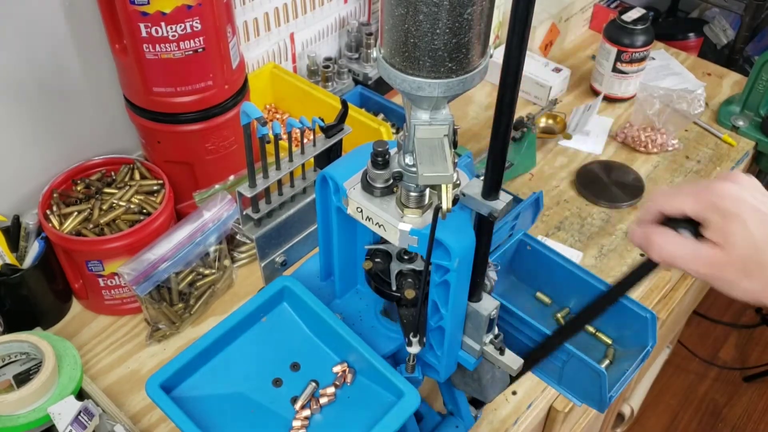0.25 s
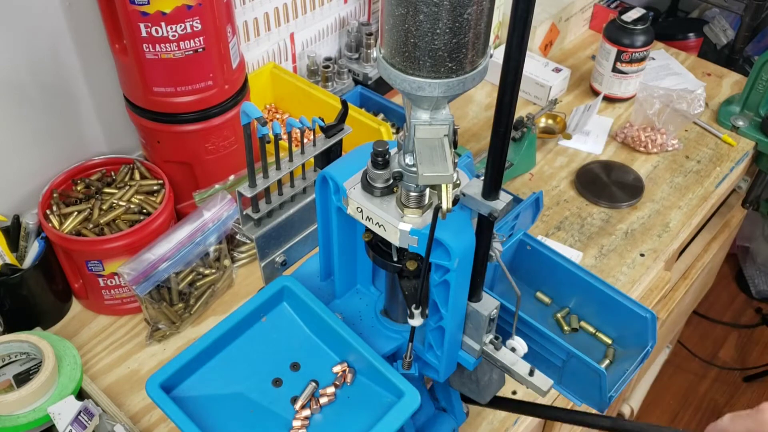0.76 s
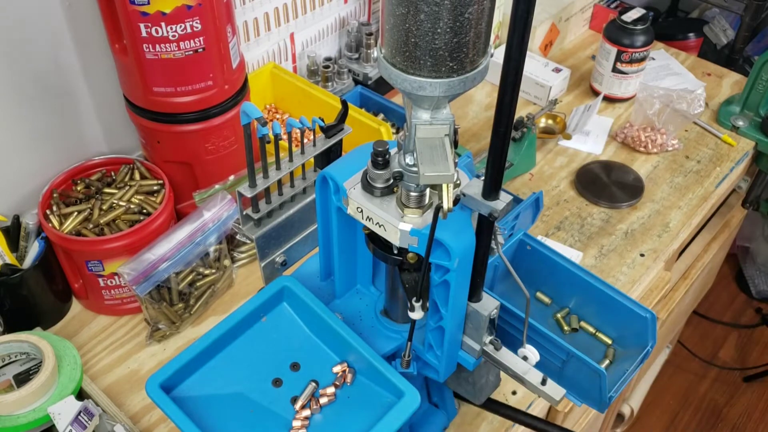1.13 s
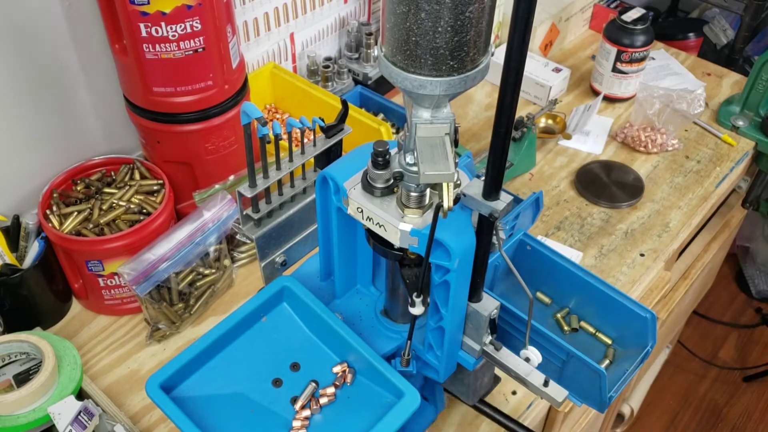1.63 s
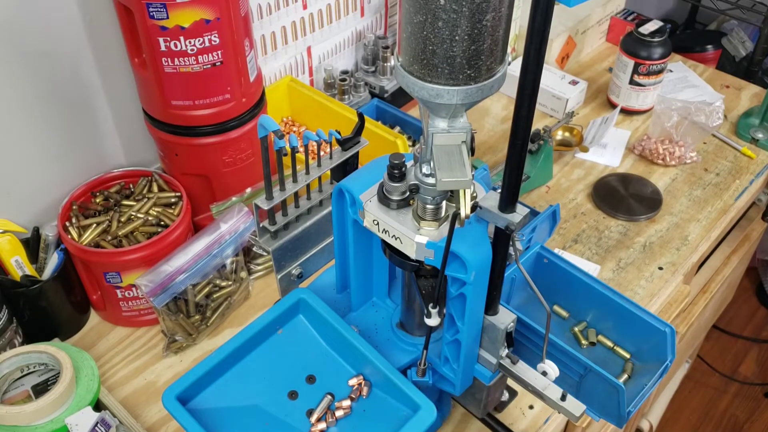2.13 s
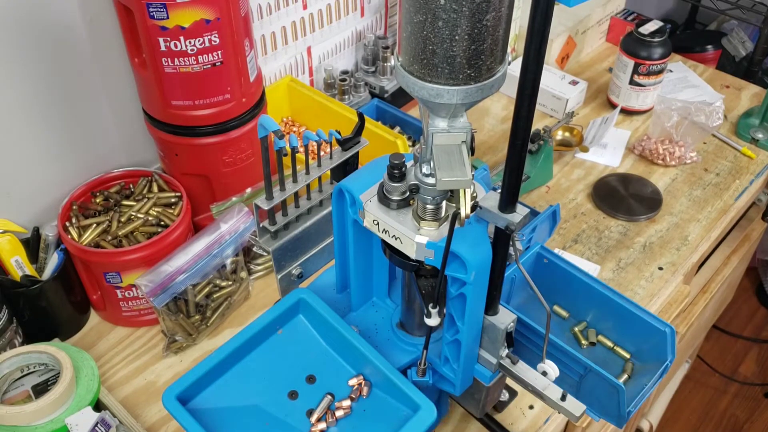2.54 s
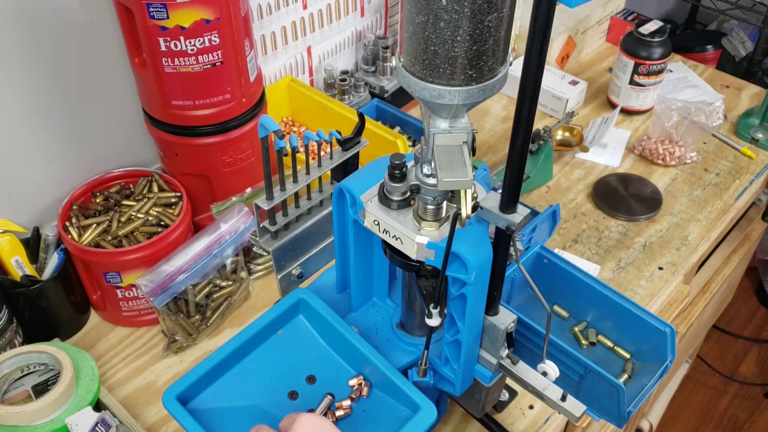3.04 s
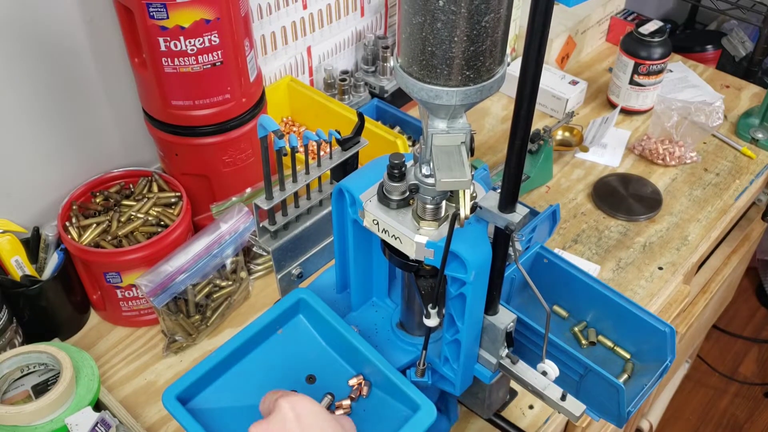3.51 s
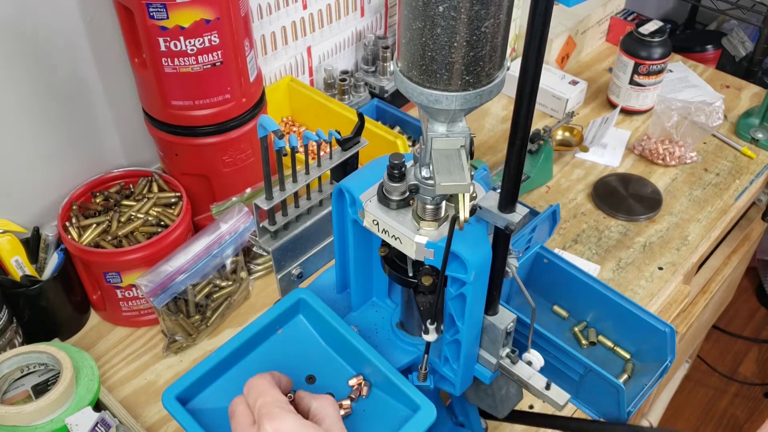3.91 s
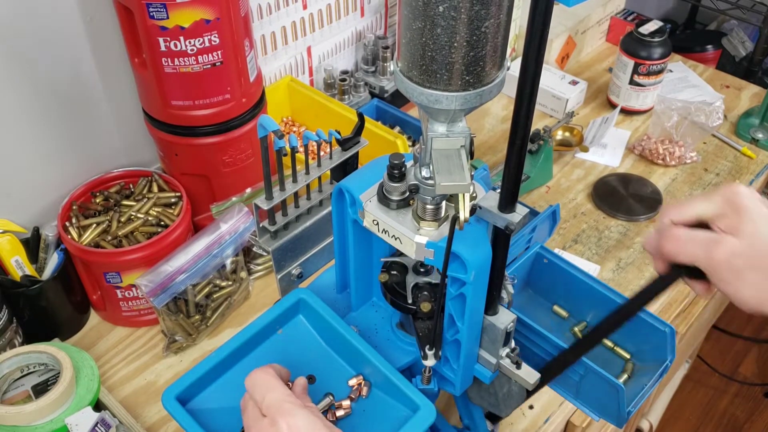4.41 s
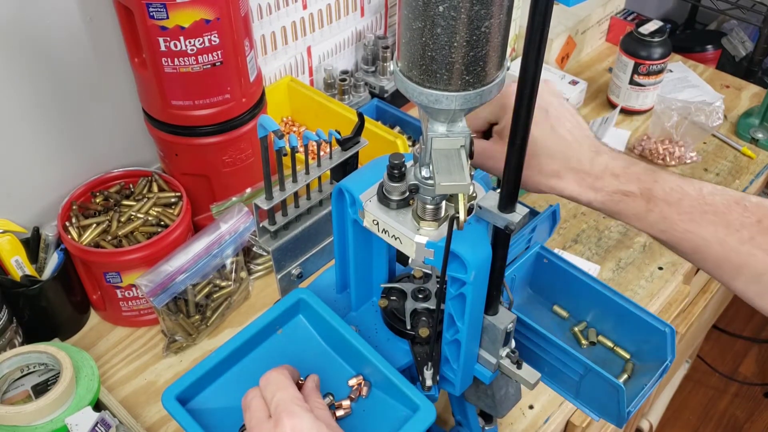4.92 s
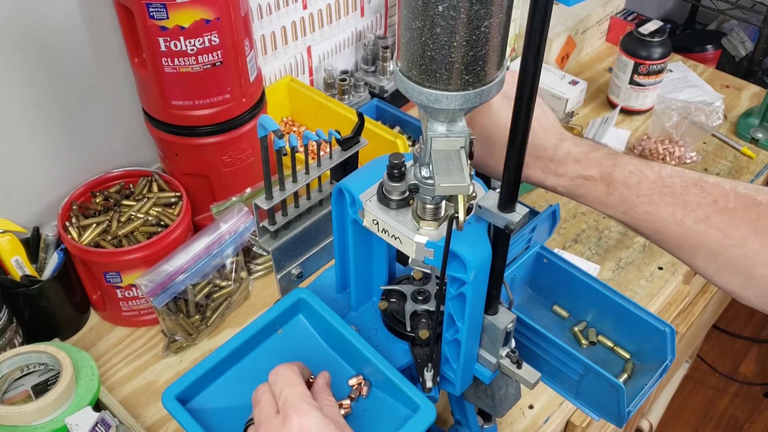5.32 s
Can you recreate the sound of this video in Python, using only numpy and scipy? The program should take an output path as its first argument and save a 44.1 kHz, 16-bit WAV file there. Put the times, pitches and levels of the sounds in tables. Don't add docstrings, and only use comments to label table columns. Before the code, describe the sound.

Sharp steel clicks, a hollow clunk, rattling linkage and bright metallic pings from a hand-operated bench press in a quiet workshop.

```python
import sys
import numpy as np
from scipy import signal
from scipy.fft import rfft, irfft, next_fast_len
from scipy.io import wavfile
from scipy.ndimage import uniform_filter1d, map_coordinates

SR = 44100
rng = np.random.default_rng(int(sys.argv[2]) if len(sys.argv) > 2 else 0)


def voltage_ratio(decibels):
    exponent = np.asarray(decibels, float) / 20
    return 10 ** exponent


def wrap_up_sound(samples):
    columns = np.atleast_2d(samples).T
    tamed = np.clip(columns, -1, 1)
    steps = np.round(tamed * 32767).astype(np.int16)
    wavfile.write(sys.argv[1], SR, steps)


N = 245195

# s, tick_db (peak), clack_db and knock_db (both over the tick)
SNAPS = [(0.1814, -13.5, -11.5, -15), (0.1908, -14.5, -11.5, -11.5), (3.4585, -30, 13, 12),
         (3.5395, -17, -22, -20), (3.6614, -24, 4.5, 18), (4.3749, -13.5, -12.5, -12.5),
         (4.653, -28, -10, -12), (4.7078, -18.5, -26, -25), (4.7095, -34, -30, -30),
         (4.7555, -1.5, -26, -29.5), (5.4325, -37, -10, 17)]
# s, tick_db, clack_db, knock_db
CLACKS = [(0.0004, -14, -8, -7.5), (0.3731, -36, 5, -12), (0.389, -30, 0, -4), (0.4026, -12, -5, -8),
          (0.4894, -35, 0, -15), (1.7175, -15.5, -2, 1), (3.412, -34, 0, 16), (3.743, -20, 0.5, 1.5),
          (4.4781, -22, -7.5, -11), (4.8408, -29, 1, 7), (4.9045, -33, -2, 3)]
# s, tick_db, clack_db, knock_db
THUDS = [(1.0899, -25.5, 9.5, 7), (1.344, -46, -2.5, 1), (1.5896, -36, 8, 12), (1.6312, -31, 5, -3),
         (3.3388, -38.5, -15, 0.5), (3.3472, -36.5, 3, 13), (3.366, -31.5, -3, -9), (3.3768, -32, -2.5, 9),
         (3.7193, -38.5, 13, 2), (3.779, -25, 3, -7), (4.995, -28, -8.5, 6), (5.0102, -38, -5, 12),
         (5.0612, -42.5, -4, 8), (5.0848, -44.5, -2, 8), (5.1354, -43, -7.5, -9)]
# s, tick_db, clack_db
TAPS = [(0.3461, -38, -9), (0.8903, -40, -10.5), (0.9972, -43, -8), (.9495, -41, -6), (1.1835, -37, 0.5),
        (1.1992, -44, 5.5), (1.4178, -33.5, -25), (1.8063, -37, -25), (1.8233, -24.5, -13.5),
        (2.595, -47, 1.5), (3.1854, -55, 10), (3.4272, -23, -7.5), (3.4872, -14.5, -5.5),
        (3.4928, -22.5, -6.5), (3.4525, -21, -22), (3.845, -38, -15), (3.7544, -17.5, -4.5),
        (4.5244, -32.5, -8), (4.609, -32.5, -4.5), (4.794, -28.5, -12), (4.9202, -35, -8)]
# s, tick_db, clack_db
SCUFFS = [(.882, -49, -8), (.9, -45, -5), (0.947, -44, -4), (1.39, -37, -8), (1.414, -40.5, -11),
          (5.304, -44.5, -3), (4.52, -40, -2), (4.609, -42, 2), (4.855, -42, 5)]
# boom_db (over the knock), t60_s
CONTACT_KINDS = [
    (-12, 0.027),
    (-17.5, 0.038),
    (-3, .036),
    (3, 0.037),
    (-2.5, .15),
]


def contacts():
    knock_db = -14.5
    taps = [(*row, knock_db) for row in TAPS]
    scuffs = [(*row, knock_db) for row in SCUFFS]
    events = []
    for rows, (boom_db, t60) in zip([SNAPS, CLACKS, THUDS, taps, scuffs], CONTACT_KINDS):
        events += [(*row, row[-1] + boom_db, t60) for row in rows]
    return events


# hz, gain_db (per Hz)
TICK_SPECTRUM = [(5000, -37.5), (7500, -6), (9900, -2), (11600, 3), (13000, -8), (14800, -4.5),
                 (16000, 0.5)]
# hz, gain_db (per Hz)
CLACK_SPECTRUM = [(700, -25), (1150, -7), (1500, 0.5), (2000, -1), (2600, -3), (3300, -4.5), (4900, -9.5),
                  (6300, -8.5), (7500, -12), (9000, -20), (12000, -56.5)]
# hz, width_hz, level_db
FRAME_MODES = [(336, 40, -3), (394, 50, -1.5), (475.6, 35, 3), (569, 35, 3.5), (629, 70, 0.5),
               (799, 113, -1), (1148, 87, -3), (1517, 84, -6.5), (2300, 2400, -16)]
# hz, width_hz, level_db
BENCH_MODES = [(64.5, 7.4, 3), (98.2, 24, 0), (150, 28, -3.5), (183.3, 19, -0.5), (234.5, 25, -1.5),
               (298, 60, -6)]
# trim_db, push_db, room_tail_db (under the blow), tail_t60_s, rise_s, decay_factor
BODY_RESPONSE = [
    (-4, -6, -14, 0.36, 0.00077, 1.06),
    (-5, -9, -10.5, 0.34, 0.00093, 0.76),
    (-2.5, 7.5, -11, 0.35, 0.0018, 0.7),
    (-2.5, 14, -3, 0.41, 0.0031, 3.1),
]


def blows():
    t = np.arange(SR // 2) / SR
    events = contacts()
    bodies = [coloured(TICK_SPECTRUM), coloured(CLACK_SPECTRUM),
              resonant(FRAME_MODES, low_hz=257, high_hz=1800),
              resonant(BENCH_MODES, low_hz=39.5, high_hz=400)]
    out = np.zeros(N)
    for k, (body, response) in enumerate(zip(bodies, BODY_RESPONSE)):
        trim_db, push_db, tail_db, tail_t60, rise, slower = response
        power, push = np.zeros(N), np.zeros(N)
        tail = voltage_ratio(tail_db - 60 * t / tail_t60) ** 2
        for s, tick_db, *over_tick_db, t60 in events:
            size = voltage_ratio(tick_db + [0, *over_tick_db][k] + trim_db)
            burst = voltage_ratio(-120 * t / (t60 * slower))
            echo = tail * min(1.5, t60 / 0.036) ** 2
            onset = rise * softness(tick_db) * max(1, t60 / 0.033)
            add(power, s, size ** 2 * (burst + echo) * np.minimum(t / onset, 1) ** 2)
            push[round(s * SR) + 20] = size * voltage_ratio(push_db) * min(1, 0.0097 / t60) / softness(tick_db)
        rattle = np.sqrt(power) * voltage_ratio(0.92 * wobble(300)) * patchy(depth_db=2.5)
        out += filtered(push + rattle, body)
    return out


# s, boom_db
HEAVES = [(3.33, -36), (3.41, -32), (3.9, -33.5), (3.5, -34), (3.58, -34), (3.68, -36), (1.1, -46)]


def heave():
    power, t = np.zeros(N), np.arange(SR // 2) / SR
    for s, db in HEAVES:
        add(power, s, voltage_ratio(db - 60 * t / 0.2) ** 2 * np.minimum(t / 0.034, 1) ** 2)
    legs = [(42, 23, 2), (67.5, 20, -1), (100, 22, -4)]  # hz, width_hz, level_db
    return filtered(np.sqrt(power) * rng.standard_normal(N), resonant(legs, low_hz=25, high_hz=200))


CASE_HZ = [4650, 8780, 11200, 11680, 13810, 13890, 15320]
# level_db, t60_s
CASE_MODES = [(-15, 0.4), (-12, 0.2), (-14, 0.3), (-2.5, 0.25), (-6, .16), (-6.5, 0.24), (-24, 0.4)]
# s, peak_db
CASE_HITS = [
    (0.182, -17.5),
    (0.192, -31),
]


def brass_case():
    return struck(CASE_HZ, CASE_MODES, CASE_HITS, trim_db=-5, unsteady_hz=250, clean_s=.12)


PLATE_HZ = [7214, 8183, 9114, 10290, 10520, 10940, 12260, 13400, 13865, 14250, 14920]
# level_db, t60_s
PLATE_MODES = [(-2.5, 0.3), (-11.5, 0.6), (-2, .22), (-11, .25), (-13, .4), (-5, 0.2), (-6, .25),
               (-10, .27), (3.5, .3), (-8, .2), (4, 0.34)]
# s, peak_db
PLATE_HITS = [
    (4.7084, -44),
    (4.755, -15),
    (4.92, -44),
]


def shell_plate():
    return struck(PLATE_HZ, PLATE_MODES, PLATE_HITS, trim_db=-4, unsteady_hz=90, clean_s=.6)


LINK_HZ = [780, 1140, 1803, 2330, 2640, 3494, 3950]
# level_db, t60_s
LINK_MODES = [(-8.5, 0.42), (-6.5, 0.25), (-7.5, 0.51), (-0.5, 0.32), (-2.5, 0.4), (-2, 0.18), (-17, .3)]
# s, peak_db
LINK_HITS = [(3.113, -49.5), (3.14, -46.5), (3.1854, -40.5), (3.211, -47), (3.727, -36), (3.7444, -27.5),
             (3.7824, -29)]


def linkage():
    return struck(LINK_HZ, LINK_MODES, LINK_HITS, trim_db=-6.5, unsteady_hz=110, clean_s=.15)


ROD_HZ = [3494]
# level_db, t60_s
ROD_MODES = [(0, .6)]
# s, peak_db
ROD_HITS = [(3.49, -48), (3.555, -48), (3.583, -43), (3.721, -29), (3.752, -28)]


def rod():
    return struck(ROD_HZ, ROD_MODES, ROD_HITS, trim_db=-2, unsteady_hz=50, clean_s=1.5)


PAWL_HZ = [2960, 5640, 7260, 9170, 11150]
# level_db, t60_s
PAWL_MODES = [(0, .1), (-9, .07), (-6, .06), (-10, .06), (-1, .05)]
# s, peak_db
PAWL_HITS = [(.882, -55), (.891, -49), (.902, -50), (.925, -53), (.9495, -48), (.972, -56), (.998, -53),
             (1.013, -58), (1.028, -58)]


def pawl():
    return struck(PAWL_HZ, PAWL_MODES, PAWL_HITS, trim_db=0, unsteady_hz=600, clean_s=.04)


# s, peak_db, pitch_hz, t60_s
PINGS = [(.403, -21, 6350, 0.09), (.44, -38, 6350, .2), (.001, -26, 1120, .1), (.404, -19, 1500, 0.1),
         (.404, -27, 3000, .08), (3.662, -18.5, 840, 0.087), (1.09, -26, 1150, 0.18),
         (1.347, -54, 2730, 0.27), (1.7185, -9, 1400, 0.04), (1.823, -42, 7200, 0.056),
         (5.434, -34, 610, 0.17), (3.428, -33, 4690, 0.12), (3.44, -38, 4690, .5), (3.49, -38, 4050, .1),
         (3.46, -34, 3900, .04), (3.8, -41, 2640, .35), (3.21, -50, 2620, .4), (3.745, -34, 2330, .3),
         (3.457, -19, 1150, 0.06), (3.72, -42, 6600, .08), (4.479, -30, 4740, 0.07), (4.49, -43, 4740, .7),
         (4.52, -42, 6880, 0.12), (4.654, -46, 7400, 0.1), (4.663, -45, 6500, .04), (4.842, -32, 1104, .07),
         (4.795, -41, 4750, 0.15), (4.756, -33, 6600, .08), (4.757, -42, 2150, .12),
         (4.842, -42, 5250, .04), (4.918, -44, 2300, .05)]
# s, peak_db, pitch_hz, t60_s
FURTHER_NOTES = [(1.7185, -16, 200, .08), (1.719, -17, 590, .07), (1.7195, -12, 1150, .07),
                 (1.727, -21, 490, .16), (1.738, -25, 370, .12), (1.79, -32, 430, .35),
                 (1.81, -36, 560, .2), (1.725, -22, 70, .5), (1.78, -25, 110, .3), (1.74, -23, 190, .25),
                 (1.76, -27, 300, .35), (1.596, -27, 200, .3), (1.595, -33, 540, .12), (1.76, -26, 161, .3),
                 (5.436, -28, 210, .15), (5.465, -31, 200, .3), (5.46, -38, 320, .3), (5.47, -40, 560, .3),
                 (5.001, -36, 1520, .06), (5.003, -33, 600, .08), (5.012, -25, 200, .1),
                 (5.057, -27, 140, .12), (5.058, -36, 620, .07), (5.084, -32, 150, .1),
                 (4.842, -35, 592, .17), (4.845, -38, 845, .11), (4.905, -39, 1100, .08),
                 (4.908, -39, 600, .1), (3.413, -28, 800, .1), (3.414, -32, 1100, .05),
                 (3.378, -32, 600, .06), (3.349, -33, 500, .06), (3.49, -34, 1800, .4),
                 (3.553, -35, 600, .06), (.001, -28, 630, .12), (.183, -32, 1696, .07),
                 (.183, -34, 1150, .06), (1.347, -52, 1100, .2), (1.347, -55, 2150, .25),
                 (1.347, -58, 5100, .15), (1.397, -52, 1150, .1), (1.397, -54, 2100, .08),
                 (1.632, -36, 2100, .08), (1.591, -44, 5100, .05), (1.24, -53, 3000, .3),
                 (4.376, -36, 600, .08)]
# s, peak_db, pitch_hz, t60_s
CLINKS = [(.346, -43.5, 11840, 0.094), (.892, -45, 11100, .1), (1.823, -39, 11300, 0.11),
          (3.31, -50, 10800, 0.31), (3.429, -26, 14100, 0.25), (3.453, -17, 14050, .07),
          (3.415, -36, 11700, .1), (3.4, -40, 10800, .15), (3.62, -42, 11200, .9),
          (3.494, -19, 13700, 0.05), (3.505, -33, 13700, .25), (3.496, -23, 12200, 0.07),
          (3.51, -36, 12200, .25), (3.495, -39, 9560, .06), (3.755, -25, 11170, 0.14),
          (3.742, -28, 11300, .06), (3.76, -28, 11700, .1), (3.745, -32, 15300, .15),
          (3.757, -24.5, 10330, 0.057), (4.375, -26.5, 10470, .06), (4.652, -27.5, 10250, 0.05),
          (4.7, -35, 10250, 0.11), (4.6627, -42, 7440, .4), (4.713, -28, 12300, .2),
          (4.709, -28, 14700, .2), (4.709, -30, 14900, .2), (4.709, -33, 14300, .15),
          (4.709, -34, 13800, .15), (4.479, -29, 11650, .08), (4.485, -41, 11600, .5),
          (4.479, -36, 9400, .08), (4.919, -31, 14920, .25), (4.919, -38, 13870, .25),
          (4.921, -40, 10520, .1), (4.8, -30, 10500, 0.14), (4.998, -51, 11200, 0.21)]
# s, peak_db, pitch_hz, t60_s
BUZZES = [(.89, -58, 3000, 0.6), (1.012, -53, 3800, 0.58), (.373, -46, 3100, .2), (4.48, -46, 3150, .3),
          (1.824, -35.5, 3700, 0.24), (4.611, -45, 3070, 0.45), (4.709, -38, 5600, .15),
          (4.709, -33, 6600, .04), (.64, -62, 5000, .9), (4.1, -58, 650, .9), (4.61, -45, 5100, 0.5),
          (4.52, -46, 5200, .6), (2.595, -54, 4800, 0.069), (3.98, -60, 520, .9), (4.15, -58, 400, .7),
          (3.2, -60, 360, 0.76), (5.44, -40, 250, .3)]


def single_notes():
    out = np.zeros(N)
    for notes, unsteady in [(PINGS, .06), (FURTHER_NOTES, .06), (CLINKS, .03), (BUZZES, .22)]:
        for s, db, hz, t60 in notes:
            add(out, s, voltage_ratio(db) * ring(hz, t60, unsteady * hz, 0.00077 * softness(db)))
    return out


# s, pitch_hz, level_db
SQUEAK = [(3.15, 7500, -92), (3.2, 7700, -73), (3.27, 7800, -78), (3.31, 8500, -60), (3.34, 8650, -68),
          (3.4, 8300, -82)]


def squeak():
    hz, db = curves(SQUEAK)
    gain = voltage_ratio(db + 4 * wobble(150))
    phase = 2 * np.pi * np.cumsum(hz + 60 * wobble(200)) / SR
    return gain * np.sin(phase)


# s (of most speed), rise_s, hiss_db, scrape_db, t60_s
STROKES = [(0.001, .01, -63, -32.5, 0.26), (0.43, 0.063, -41, -34, 0.34), (0.93, 0.18, -58, -63.5, 2.7),
           (1.25, 0.17, -57, -78, 0.75), (1.75, .12, -54, -70, 0.46), (2.62, .03, -61.5, -70.5, 2.3),
           (3.17, 0.14, -63.5, -71, 2.9), (3.42, 0.082, -42, -49.5, 1), (3.53, .08, -47, -63, .7),
           (3.76, 0.047, -41.5, -52, 0.78), (3.98, 0.087, -50, -63, 2.1), (4.55, 0.09, -53.5, -55, 1.1),
           (4.8, .05, -43, -45.5, 0.28), (5.33, 0.059, -56, -62, 2.5), (5.48, 0.12, -46.5, -54, 0.3)]


def strokes():
    t = np.arange(0, N + 64, 64) / SR
    power = 0
    for s, rise, hiss_db, scrape_db, t60 in STROKES:
        shape = voltage_ratio(np.where(t < s, 40 * (t - s) / rise, -120 * (t - s) / t60))
        power = power + voltage_ratio([[hiss_db], [scrape_db]]) ** 2 * shape
    return curves(np.transpose([t, *np.sqrt(power)]))


# hz, gain_db (per Hz)
HISS_SPECTRUM = [(6000, -47.5), (8000, -28), (9000, -13.5), (11300, 1.5), (12800, -6), (14800, -8.5),
                 (16000, -12.5)]
# hz, gain_db (per Hz)
SCRAPE_SPECTRUM = [(1240, -45.5), (2100, -4.5), (2280, -2), (2450, -3), (4360, -6.5), (7400, -1),
                   (8800, -4.5), (11400, -24), (19400, -120)]


def slide():
    hiss_gain, scrape_gain = strokes()
    grip_db = 0.82 * wobble(40)
    hiss = hiss_gain * voltage_ratio(grip_db) * filtered(patchy(depth_db=3.0), coloured(HISS_SPECTRUM))
    scrape_gain = scrape_gain * voltage_ratio(grip_db + 0.69 * wobble(22))
    return hiss + scrape_gain * filtered(patchy(depth_db=3.5), coloured(SCRAPE_SPECTRUM))


# s, level_db
HUM_OVERTONE = [(0, -60.5), (.3, -53), (3.7, -49.5), (4.1, -57), (5.56, -58.5)]


def hum():
    turn = 2 * np.pi * 60 * np.arange(N) / SR
    high_db, = curves(HUM_OVERTONE)
    second = voltage_ratio(-45.5 + 1.6 * wobble(3) + 1.2 * wobble(16)) * np.sin(2 * turn)
    fourth = voltage_ratio(high_db + 3 + 1.5 * wobble(4.98)) * np.sin(4 * turn + 1.06)
    return second + fourth + voltage_ratio(-72) * np.sin(6 * turn)


# hz, gain_db (per Hz)
AIR_SPECTRUM = [(12, -51), (20, -26), (69, -2), (99, -6), (124, -4), (142, -9.5), (185, -11), (221, -11),
                (250, -6.5), (311, -18.5), (420, -28.5), (1010, -39.5), (1670, -28), (2090, -40.5),
                (2400, -41.5), (3120, -72.5), (5280, -120)]
# hz, gain_db (per Hz)
REST_SPECTRUM = [(1900, -30), (2500, -9.5), (3300, -8.5), (4170, -14), (6860, -17), (8500, -14),
                 (11100, -2), (15700, -6)]


def air():
    hiss = voltage_ratio(-67) * filtered(rng.standard_normal(N), coloured(REST_SPECTRUM))
    swell = voltage_ratio(-51.5 + 0.68 * wobble(6.8))
    return hiss + swell * filtered(rng.standard_normal(N), coloured(AIR_SPECTRUM))


def struck(pitches, modes, hits, trim_db, unsteady_hz, clean_s):
    out = np.zeros(N)
    for s, db in hits:
        rise = 0.00042 * softness(db)
        for hz, (level_db, t60) in zip(pitches, modes):
            gain = voltage_ratio(db + trim_db + level_db + rng.normal(0, 1.5))
            add(out, s, gain * ring(hz, t60, unsteady_hz, rise, clean_s))
    return out


def ring(hz, t60, unsteady_hz, rise, clean_s=.1):
    t = np.arange(SR // 2)[:int(t60 * SR)] / SR
    depth = min(1, np.sqrt(.1 / clean_s))
    in_phase, quadrature = [depth * np.interp(t * unsteady_hz, np.arange(400), knots)
                            for knots in rng.standard_normal((2, 400))]
    turn = 2 * np.pi * hz * t
    note = (voltage_ratio(-60 * t / clean_s) + voltage_ratio(-5) * in_phase) * np.sin(turn)
    note += voltage_ratio(-4) * quadrature * np.cos(turn)
    return voltage_ratio(-60 * t / t60) * note * np.minimum(t / rise, 1)


def softness(db):
    return max(1, voltage_ratio(-.35 * (db + 18.0)))


def patchy(depth_db):
    z = signal.stft(rng.standard_normal(N + 512), nperseg=256)[2]
    field = uniform_filter1d(rng.standard_normal(z.shape), 3, axis=0)
    field = uniform_filter1d(field, 11, axis=1)
    return unit(signal.istft(z * voltage_ratio(depth_db * unit(field)), nperseg=256)[1][:N])


def resonant(peaks, low_hz, high_hz):
    def response(f):
        edges = (1j * f / low_hz / (1 + 1j * f / low_hz) / (1 + 1j * f / high_hz)) ** 2
        total = 0
        for k, (centre, width, db) in enumerate(peaks):
            mode = 1j * f * width / (centre * centre - f * f + 1j * f * width)
            total = total + (-1) ** k * voltage_ratio(db) * mode
        return edges * total
    return response


def coloured(points):
    def response(hz):
        f, db = np.transpose(points)
        gain_db = np.interp(np.log(hz + 1), np.log(f), db)
        cepstrum = irfft(np.log(voltage_ratio(np.maximum(gain_db, -70))))
        half = len(cepstrum) // 2
        cepstrum[1:half] *= 2
        cepstrum[half + 1:] = 0
        return np.exp(rfft(cepstrum))
    return response


def filtered(x, response):
    m = next_fast_len(N + SR // 2, True)
    h = response(np.fft.rfftfreq(m, 1 / SR))
    h = h / np.sqrt(np.mean(np.abs(h) ** 2))
    return irfft(rfft(x, m) * h, m)[:N]


def unit(x):
    return x / np.sqrt(np.mean(x ** 2) + 1e-20)


def curves(rows):
    s, *columns = np.transpose(rows)
    return [np.interp(np.arange(N) / SR, s, column) for column in columns]


def wobble(rate):
    return map_coordinates(rng.standard_normal(int(N * rate / SR) + 4), [np.arange(N) * rate / SR])


def add(track, s, sound):
    part = track[round(s * SR):][:len(sound)]
    part += sound[:len(part)]


def scene():
    press = blows() + heave()
    ringing = brass_case() + shell_plate() + linkage() + rod() + pawl() + single_notes()
    return (press + ringing + squeak() + slide() + hum() + air())[None]


# hz, gain_db
MIC_RESPONSE = [(20, -8), (40, -.1), (7500, -.1), (8500, -11), (9500, -.1), (15700, -.1), (15900, -38),
                (16900, -50)]


def microphone(pressure):
    return voltage_ratio(-1.5) * filtered(pressure[0], coloured(MIC_RESPONSE))[None]


def roll_off(x):
    return signal.sosfilt(signal.butter(12, 16980, fs=SR, output="sos"), x)


def record(dry):
    mix = microphone(dry)
    return roll_off(mix)


dry = scene()
out = record(dry)
wrap_up_sound(out)
```